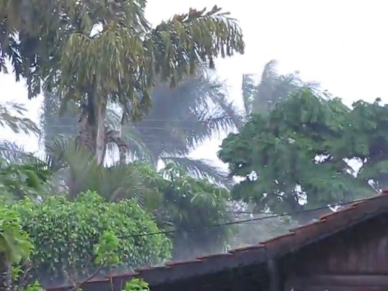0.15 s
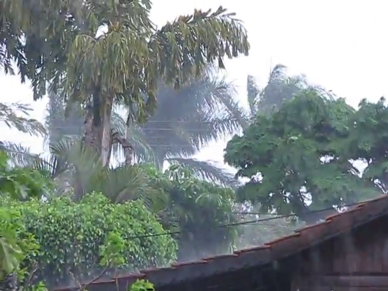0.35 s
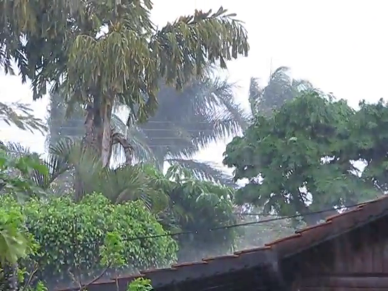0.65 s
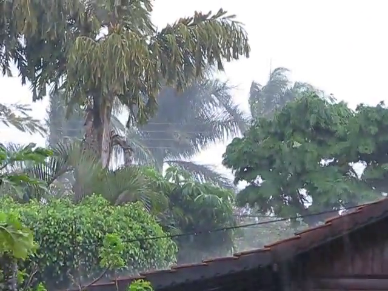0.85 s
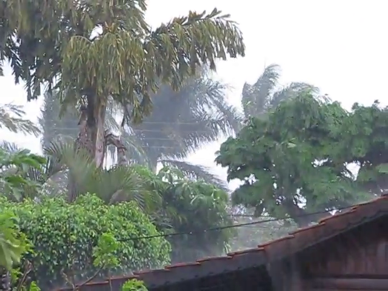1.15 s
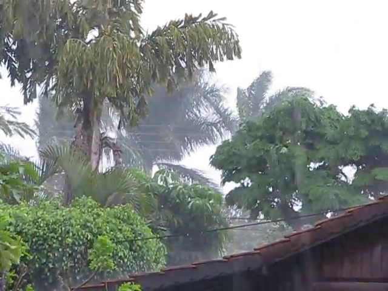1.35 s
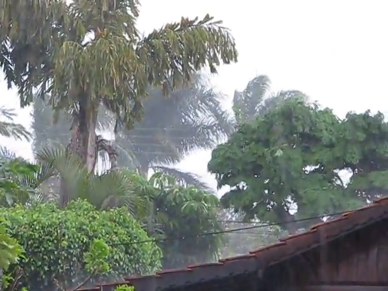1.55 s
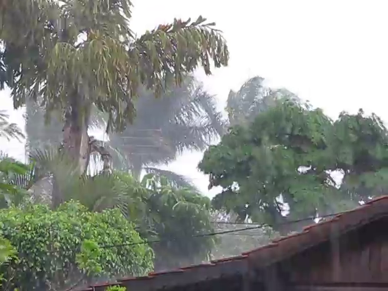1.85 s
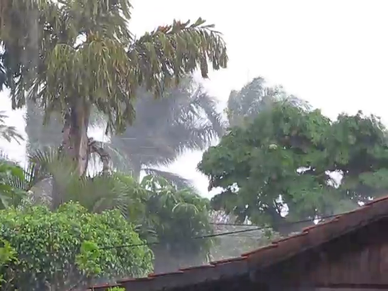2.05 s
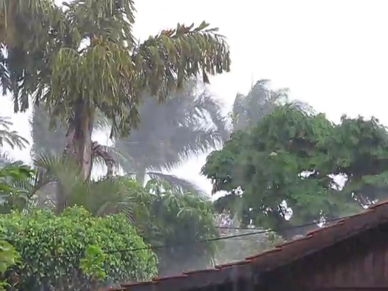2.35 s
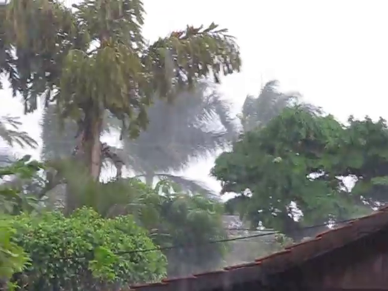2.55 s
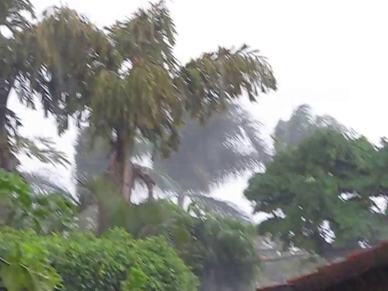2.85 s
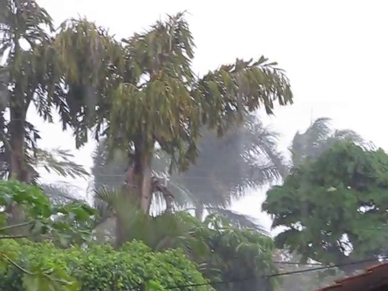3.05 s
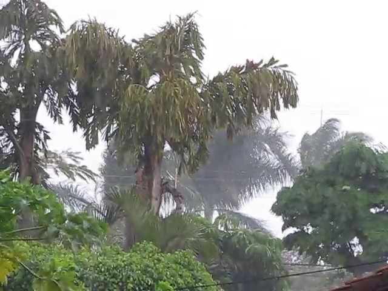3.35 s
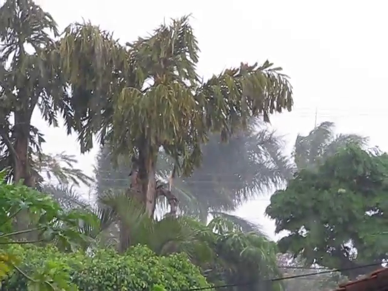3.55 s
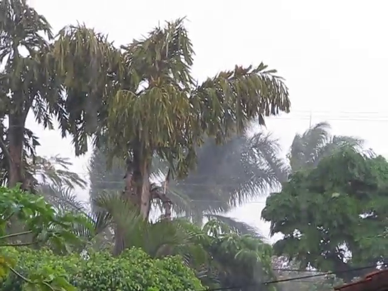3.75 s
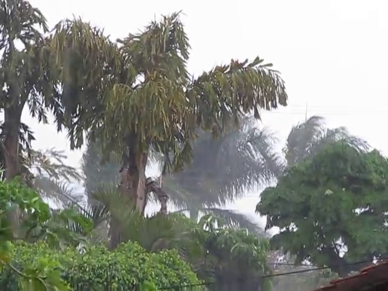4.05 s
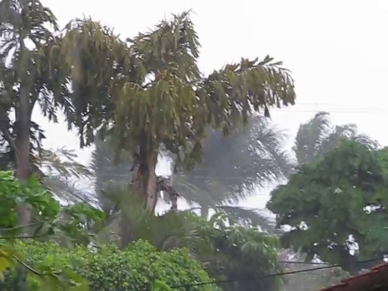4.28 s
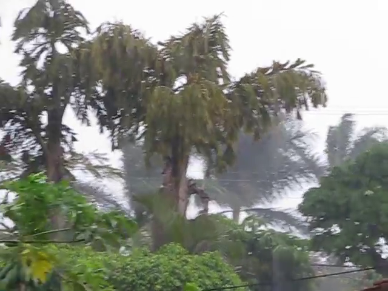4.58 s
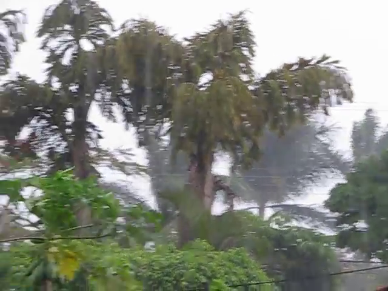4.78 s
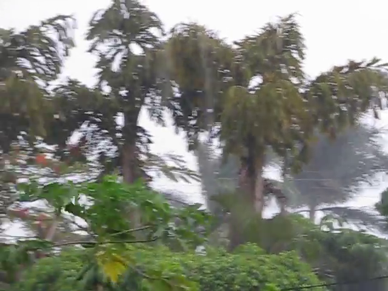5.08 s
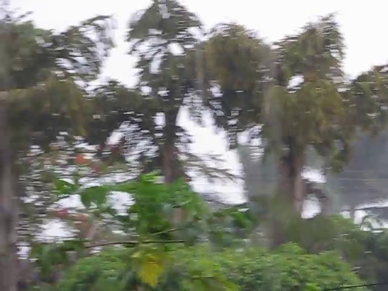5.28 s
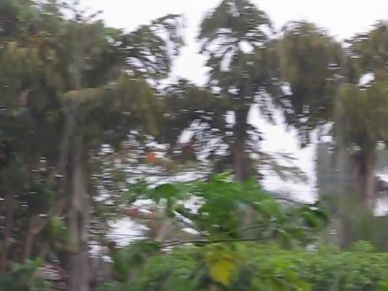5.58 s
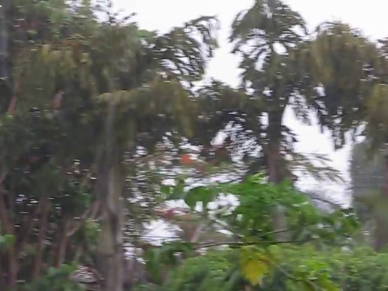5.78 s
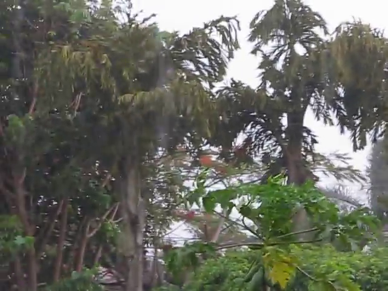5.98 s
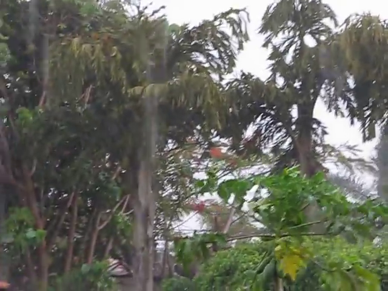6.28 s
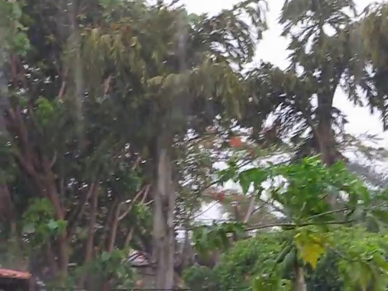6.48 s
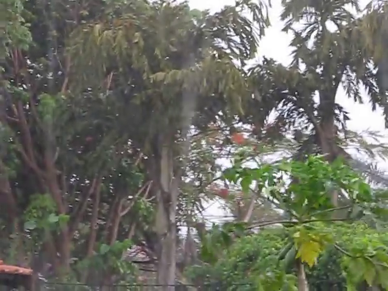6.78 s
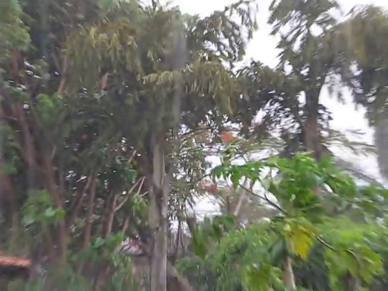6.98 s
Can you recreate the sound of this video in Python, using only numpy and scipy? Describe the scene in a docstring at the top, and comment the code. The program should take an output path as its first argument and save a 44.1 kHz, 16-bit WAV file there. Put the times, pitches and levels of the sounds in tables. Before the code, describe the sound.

Continuous downpour outdoors among palms and shrubs: a wide, full hiss with thousands of crisp patters in front. Sharp, clicky drops from the eaves land close by, loudest in the first second and around four seconds, with lower taps on broad leaves. Faint low air movement and dull thuds sit underneath. The small handheld stereo microphone is sheltered near a wall, and the rain thickens toward the finish.

```python
"""Heavy rain under the eaves

Heavy rain on a garden, heard from under a roof edge on a small stereo camera. Far drops merge into a wash
of filtered noise; nearer ones patter on leaves as thousands of coloured ticks. Drops from the eaves smack
on wet ground as short pulses, with a spray of noise and a quick echo off the house wall. Moving air and a
few soft bumps are low noise."""
import sys
import numpy as np
from scipy import signal
from scipy.fft import rfft, irfft, next_fast_len
from scipy.io import wavfile
from scipy.ndimage import uniform_filter1d

SR = 44100
rng = np.random.default_rng(int(sys.argv[2]) if len(sys.argv) > 2 else 0)


def store_pcm(level_fs):
    """Save levels as 16-bit WAV."""
    pcm = np.round(np.clip(level_fs, -1, 1) * 32767).astype(np.int16)
    wavfile.write(sys.argv[1], SR, np.atleast_2d(pcm).T)


N = 314433
TIME = np.arange(N) / SR
PORT_GAP_S = .00017  # longest travel time from one microphone port to the other
WALL_ECHO_S = .00343  # usual delay of the wall echo
MID_SIDE = np.array([[1], [-1]])  # sign of the side signal at the left and right port


def undb(db):
    """Decibels to gain."""
    return 10 ** (np.asarray(db) / 20)


def unit(x):
    """Scale to rms 1."""
    return x / np.sqrt(np.mean(x ** 2))


def curve(table):
    """Value at every sample, drawn straight between the (s, value) rows of a table."""
    s, value = np.transpose(table)
    return np.interp(TIME, s, value)


def colour(points, hz):
    """Gain of a (Hz, dB) spectrum at the given frequencies."""
    f, db = np.transpose(points)
    return undb(np.interp(np.log(hz + 1), np.log(f), db))


def spectrum_of(x):
    """Frequencies and spectrum of a whole signal."""
    size = next_fast_len(N, real=True)
    return np.fft.rfftfreq(size, 1 / SR), rfft(x, size)


def tint(x, points):
    """Filter with a (Hz, dB) spectrum."""
    hz, spec = spectrum_of(x)
    return irfft(spec * colour(points, hz))[..., :N]


def walk(rate_hz):
    """Smooth random wander with a spread near 1, taking a new step rate_hz times a second."""
    hold = max(int(SR / rate_hz), 1)
    steps = np.repeat(rng.standard_normal(N // hold + 1), hold)[:N]
    smooth = uniform_filter1d(uniform_filter1d(steps, hold), hold)
    return 1.3 * smooth  # smoothing shrinks the spread


def wash(flicker_db, count=9):
    """Far rain from all round: alike at both ports in the bass, each octave wavering as sheets of rain pass."""
    # Colour of the far rain. Each row: frequency in Hz, relative level in dB.
    wash_colour = [(25, -48), (70, -24), (150, -18.5), (270, -7.5), (380, -5.5), (475, -1), (650, -1),
                   (825, 0), (1200, -1), (1700, 0), (3000, -1), (5300, -4.5), (7400, -7.5), (9000, -12.5),
                   (15500, -23)]
    # How alike far rain arrives at the two ports. Each row: frequency in Hz, correlation from -1 to 1.
    likeness = [(60, 1), (280, 0.99), (640, 0.89), (1600, 0.6), (2400, 0.16), (3500, 0.12), (6500, -0.2),
                (9000, -0.034), (10600, 1), (13500, -0.66)]
    hz, (mid, side) = spectrum_of(rng.standard_normal((2, N)))
    alike = np.clip(np.interp(hz, *np.transpose(likeness)), -1, 1)
    ports = mid * np.sqrt(1 + alike) + MID_SIDE * side * np.sqrt(1 - alike)
    ports = ports * colour(wash_colour, hz)
    octave = np.clip(np.log2((hz + 1) / 62.5), 0, count - 1)
    out = 0
    for k in range(count):
        overlap = np.maximum(1 - abs(octave - k), 0)  # neighbouring bands crossfade
        band = irfft(ports * overlap)[:, :N]
        out = out + band * undb(flicker_db * walk(14))
    return unit(out)


def patter(per_s, spread_db, flurry_db, wall_db):
    """Thousands of tiny ticks on leaves and tiles, each from its own direction, most of them weak."""
    # Colour of the ticks. Each row: frequency in Hz, relative level in dB.
    tick_colour = [(1000, -21), (2000, -6.5), (3500, -1), (5300, 3.5), (7400, 0.5), (9300, -5), (12000, -5),
                   (15500, -12)]
    when, size, side, sign, path = rng.random((int(per_s * N / SR), 5)).T
    at = (when * N).astype(int)
    rarity = np.minimum(-np.log(1 - size), 4.5)  # loud ticks are rare, and capped
    push = undb(spread_db * rarity) * np.sign(sign - .5)
    lag = np.round((2 * side - 1) * PORT_GAP_S * SR).astype(int)
    wall = (WALL_ECHO_S * SR * (1 - path ** 2 / 2)).astype(int)  # slanting paths return sooner
    ticks = []
    for arrival in (at, at + lag):
        direct = np.bincount(arrival % N, push, N)
        echo = np.bincount((arrival + wall) % N, push, N)
        ticks.append(direct + undb(wall_db) * echo)
    return unit(tint(np.array(ticks), tick_colour)) * undb(flurry_db * walk(25.02))


def draught(side_db, flutter_db):
    """Soft low buffeting of moving air, partly different at the two ports."""
    # Colour of the buffeting. Each row: frequency in Hz, relative level in dB.
    buffet_colour = [(20, -23), (45, -5), (70, 0.5), (130, -1.5), (220, -5), (400, -20)]
    mid, side = tint(rng.standard_normal((2, N)), buffet_colour)
    return unit(mid + undb(side_db) * side * MID_SIDE) * undb(flutter_db * walk(46))


def small_drips(rain_db, per_s, above_db, spread_db, centre_hz, octaves, spray_db):
    """Rows for lighter drops: each falls at a random moment of its turn, louder as the rain swells."""
    count = int(per_s * N / SR)
    when, size, pitch = rng.random((count, 3)).T
    s = (np.arange(count) + when) / count * N / SR
    peak_db = np.interp(s, TIME, rain_db) + above_db + spread_db * size
    centres = centre_hz * 2 ** (octaves * (2 * pitch - 1))
    return np.transpose([s, peak_db, centres, peak_db + spray_db])


def splashes(rows, octaves, lag_s, right_db, echo_db, echo_bright, spray_s, spray_grain, spray_bright, size=2048):
    """Each drop smacks for about one cycle, the wall returns it, and thrown droplets land around it."""
    s, peak_db, centre, spray_db = np.transpose(rows)[:, :, None]
    hz, t = np.fft.rfftfreq(size, 1 / SR) + 1, np.arange(size) / SR
    lead = .001  # seconds of room ahead of each pulse
    place = rng.standard_normal((len(rows), 4)).T[:, :, None]

    def smack(centre):
        """Spectrum of a short pulse: a bell on the octave scale, scaled for a peak near 1 in time."""
        bell = np.exp(-(np.log2(hz / centre) / octaves) ** 2 / 2)
        phase = np.exp(1j * place[3])  # no two drops push alike
        return bell / bell.mean(axis=1, keepdims=True) * phase

    def late(delay):
        """The turn of phase that a delay gives."""
        return np.exp(-2j * np.pi * hz * (lead + delay))

    # the echo meets the ports more squarely, so it is the brighter of the two
    direct = smack(centre / np.sqrt(echo_bright))
    echo = undb(echo_db) * smack(centre * np.sqrt(echo_bright))
    wall_s = WALL_ECHO_S + 0.000168 * place[0]  # the path depends on where the drop lands
    age = np.maximum(t - lead, 0)
    cloud = (1 - np.exp(-age / 0.0021)) * np.exp(-age / spray_s) * (1 - t / t[-1])
    starts = np.clip((s[:, 0] - lead) * SR, 0, N).astype(int)
    out = np.zeros((2, N + 2 * size))
    for ear, side in enumerate((1, -1)):
        # the drip line lies to the right, so the left port hears it later and weaker
        hit = direct * late(side * lag_s * (1 + 0.23 * place[1]) / 2)
        hit = hit + echo * late(wall_s + side * lag_s * (.5 + 0.31 * place[2]) / 2)
        noise = rng.standard_normal((len(rows), size))
        grains = np.sign(noise) * abs(noise) ** spray_grain  # a power above 1 makes noise spikier
        droplets = irfft(rfft(grains * cloud) * smack(centre * spray_bright))
        droplets = droplets / droplets[:, :size // 4].std(axis=1, keepdims=True)
        sounds = undb(peak_db - side * right_db / 2) * irfft(hit) + undb(spray_db) * droplets
        for start, sound in zip(starts, sounds):
            out[ear, start:start + size] += sound
    return out[:, :N]


def bumps(octaves, side_db, size=16384):
    """Dull thuds, as of a hand on the camera: low bands of noise that die away quickly."""
    # Each row: start in seconds, level in dB before the fade, centre in Hz, fading time in seconds.
    thuds = [(0.069, -44, 140, 0.067), (0.27, -43, 155, 0.1), (.605, -37, 187, 0.06),
             (0.701, -45, 131, 0.075), (.995, -48, 75, .04), (2.211, -50, 50, 0.11),
             (2.245, -43, 145, 0.057), (3.62, -60, 70, .06), (6.272, -49, 75, 0.08), (6.48, -53, 75, .04)]
    hz, age = np.fft.rfftfreq(size, 1 / SR) + 1, np.arange(size) / SR
    out = np.zeros((2, N + size))
    for s, db, centre, fade_s in thuds:
        bell = np.exp(-(np.log2(hz / centre) / octaves) ** 2 / 2)
        mid, side = irfft(rfft(rng.standard_normal((2, size))) * bell)
        shape = (1 - np.exp(-age / 0.0046)) * np.exp(-age / fade_s)
        rumble = unit(mid + undb(side_db) * side * MID_SIDE)
        start = int(s * SR)
        out[:, start:start + size] += undb(db) * shape * rumble
    return out[:, :N]


def fat_drips(spray_db, growth):
    """Rows for the fattest drops from the eaves: the harder the smack, the more spray it throws."""
    # Each row: start in seconds, nominal peak of the smack in dB, middle of smack and echo in Hz.
    fat_drops = [(0.0799, -9.5, 4370), (0.1011, -9, 5900), (0.1488, -6.5, 3500), (0.2398, -6, 7600),
                 (0.3004, -3.5, 5200), (0.4037, -2, 5840), (0.63, -3, 5800), (0.6384, -16, 5300),
                 (0.6414, -5, 6960), (0.7799, -2, 5150), (0.8425, -18, 5500), (1.0757, -14, 5460),
                 (1.261, -13, 6100), (1.3545, -9.5, 6860), (1.381, -12, 5400), (1.5373, -10.5, 5000),
                 (1.6166, -8, 5500), (1.9818, -4, 5030), (2.003, -11, 6400), (2.249, -9, 5840),
                 (2.2729, -7.5, 7240), (2.5764, -14, 5300), (2.6951, -11, 4830), (2.7543, -8, 5500),
                 (2.8134, -6.5, 5500), (2.9064, -7, 5300), (3.0103, -11, 5430), (3.2645, -7, 6100),
                 (3.424, -7, 5240), (3.4667, -7, 7550), (3.5794, -7, 5530), (3.8022, -8, 6300),
                 (3.8102, -7.5, 5400), (3.87, -13, 5900), (3.9622, -7, 5960), (3.9735, -9, 6100),
                 (4.009, -2, 5870), (4.024, -4, 5500), (4.2567, -9.5, 4500), (4.2782, -6, 7060),
                 (4.8402, -9, 4600), (4.937, -15, 4970), (5.1335, -6, 5300), (5.3049, -8, 4500),
                 (5.3448, -7.5, 7900), (5.3928, -6.5, 4660), (5.5089, -9, 7300), (5.571, -5.5, 5230),
                 (5.7776, -2.5, 5760), (5.9645, -7, 6660), (6.332, -9, 3730), (6.6381, -6, 4800),
                 (6.8609, -6.5, 5000)]
    s, peak_db, centre_hz = np.transpose(fat_drops)
    return np.transpose([s, peak_db, centre_hz, spray_db + growth * peak_db])


def scene():
    """Wash, patter, eaves drips, moving air and bumps."""
    # Loudness of the rain wash and of the taps on broad leaves; it dips just after the loudest drips and swells
    # back. Each row: time in seconds, level in dB before layer trims.
    rain_db = curve([(0.0, -29), (0.45, -31.5), (0.62, -31.5), (0.88, -34), (1.55, -31.5), (1.68, -34),
                     (2.35, -33), (2.75, -31), (3.1, -32), (3.78, -29), (4.08, -33), (4.65, -30.5),
                     (5.25, -28), (6.1, -29.5), (6.95, -25.5), (7.13, -25.5)])
    # Rain on the nearest leaves, driving patter and light drops.
    # Each row: time in seconds, level in dB before layer trims.
    near_db = curve([(0.0, -25.9), (0.5, -31), (1.0, -33), (1.5, -31.4), (2.35, -34), (2.75, -29.4),
                     (3.8, -28.1), (4.55, -30), (5.3, -27), (6.15, -28), (6.9, -24.5), (7.13, -25.5)])
    # Air on the microphone. Each row: time in seconds, level in dB.
    air_db = curve([(0, -58), (.75, -52), (1.4, -56), (1.7, -61.5), (2.9, -68), (3.45, -54), (4.2, -69),
                    (6.3, -58), (7.13, -61)])
    wash_trim_db, patter_trim_db = 3, -1.5
    far = wash(flicker_db=0.73) * undb(rain_db + wash_trim_db)
    leaves = patter(per_s=4200, spread_db=3.5, flurry_db=2.05, wall_db=-3.0) * undb(near_db + patter_trim_db)
    air = draught(side_db=-4, flutter_db=.8) * undb(air_db)
    thuds = bumps(octaves=0.84, side_db=-13)
    # the eaves drip all the time, and fine drops fall between
    eaves = small_drips(near_db, per_s=14, above_db=13.5, spread_db=6.0,
                        centre_hz=5760, octaves=0.36, spray_db=-21.5)
    light = small_drips(near_db, per_s=20, above_db=8.0, spread_db=9,
                        centre_hz=7260, octaves=0.51, spray_db=-23.5)
    # drops on broad leaves sound lower
    taps = small_drips(rain_db, per_s=14, above_db=6, spread_db=7.5,
                       centre_hz=2700, octaves=.5, spray_db=-14)
    # spray_db is for a full-scale smack, growth is dB of spray per dB of smack
    fat = fat_drips(spray_db=-26.5, growth=0.28)
    drops = splashes(np.vstack([fat, eaves, light, taps]), octaves=.48, lag_s=.00006, right_db=1.0,
                     echo_db=1.6, echo_bright=1.27, spray_s=.026, spray_grain=1.9, spray_bright=0.96)
    return far + leaves + drops + air + thuds


def record(dry):
    """Each port has its own colour; the camera rounds peaks near full scale and cuts the top."""
    # The ports hear unequally. Each row: frequency in Hz, left minus right level in dB.
    port_balance = [(60, 1.5), (200, 0), (1100, 0), (2800, -2.5), (4100, 0.5), (5300, -2), (6800, -1.1),
                    (8000, 0), (9300, 5), (10500, 5.5), (13000, 0.5), (15000, 1)]
    top_hz = 15900
    hz, spec = spectrum_of(dry)
    tilt = np.sqrt(colour(port_balance, hz))  # half the difference to each port
    heard = irfft(spec * np.array([tilt, 1 / tilt]))[:, :N]
    heard = heard / (1 + (heard / .95) ** 6) ** (1 / 6)
    steep_cut = signal.ellip(10, .1, 80, top_hz, fs=SR, output="sos")
    return signal.sosfilt(steep_cut, heard)


dry = scene()
out = record(dry)
store_pcm(out)
```